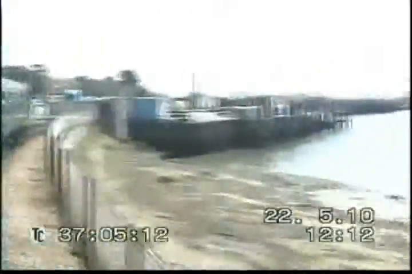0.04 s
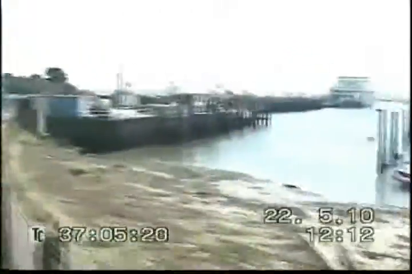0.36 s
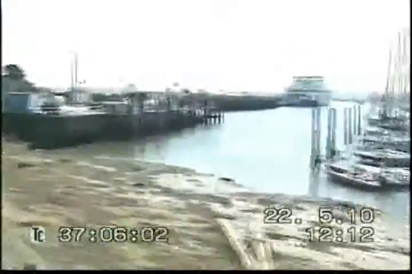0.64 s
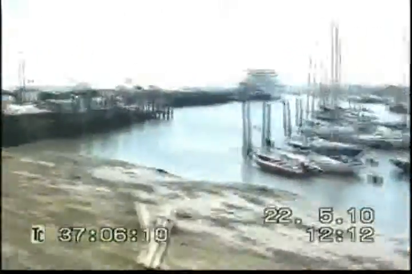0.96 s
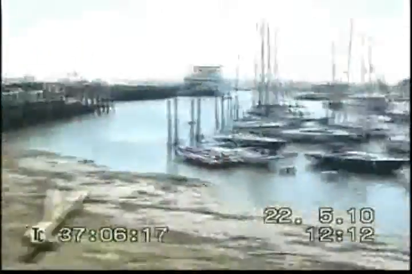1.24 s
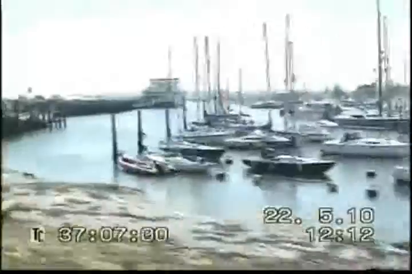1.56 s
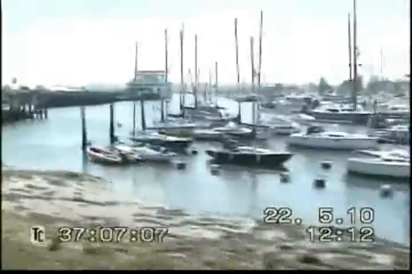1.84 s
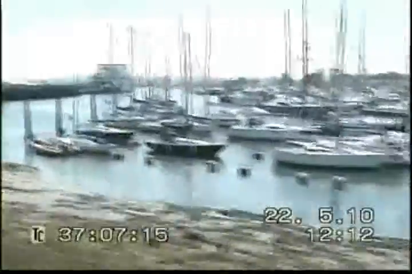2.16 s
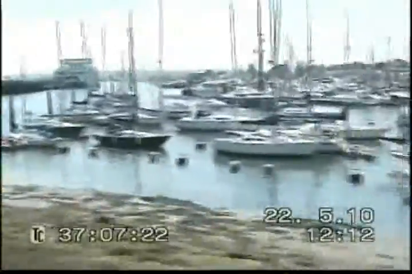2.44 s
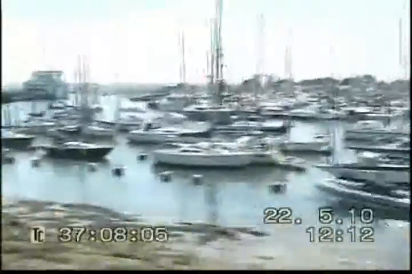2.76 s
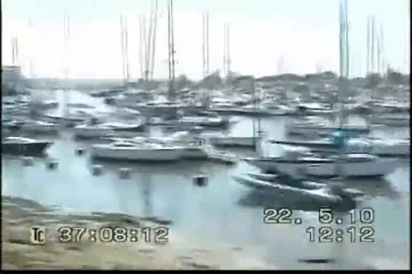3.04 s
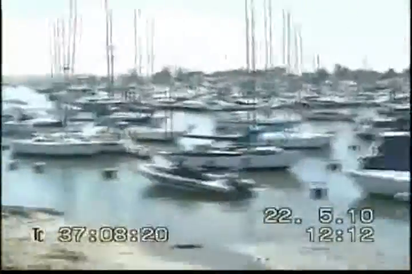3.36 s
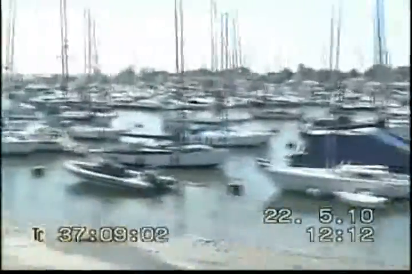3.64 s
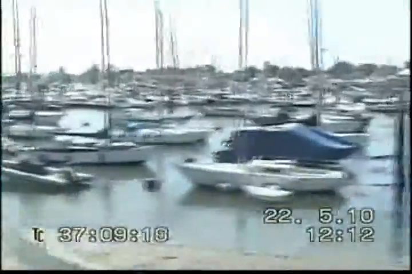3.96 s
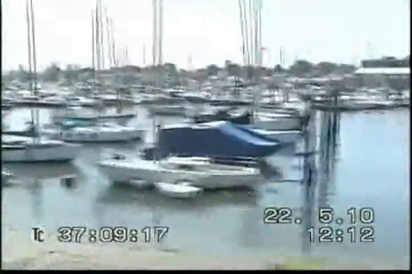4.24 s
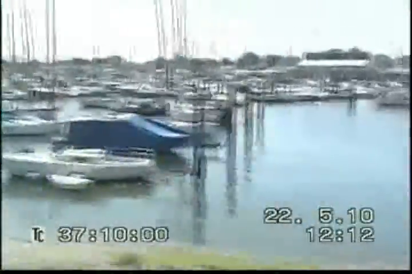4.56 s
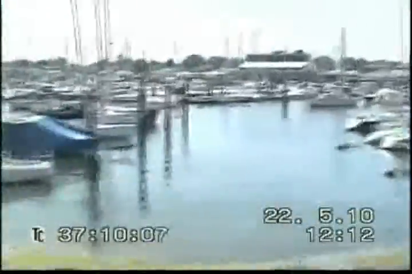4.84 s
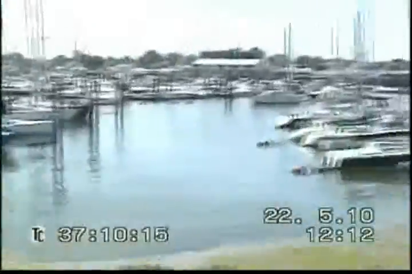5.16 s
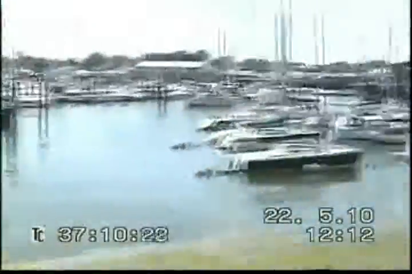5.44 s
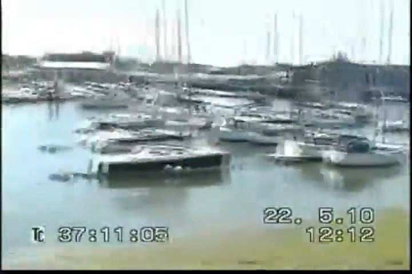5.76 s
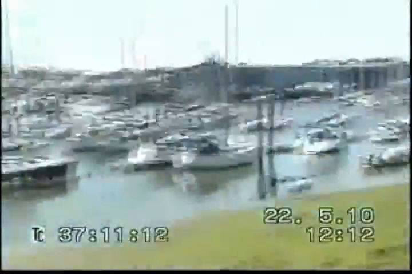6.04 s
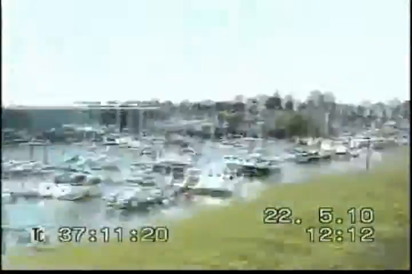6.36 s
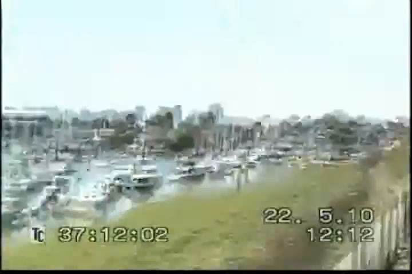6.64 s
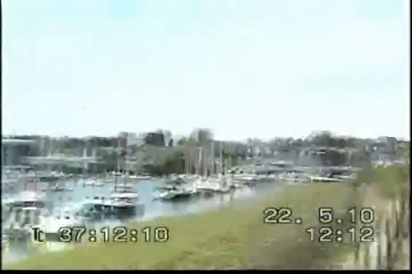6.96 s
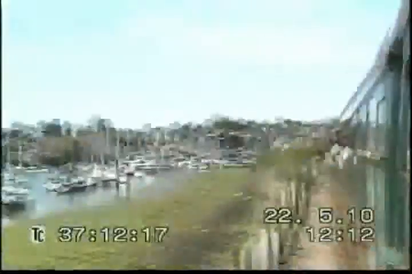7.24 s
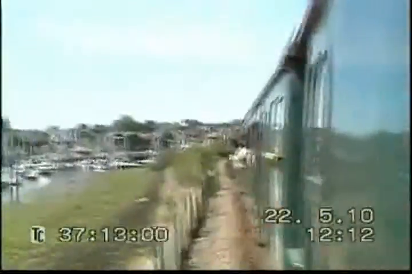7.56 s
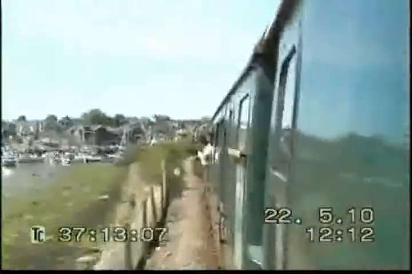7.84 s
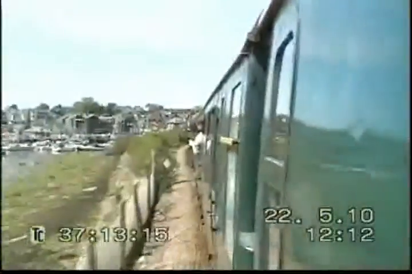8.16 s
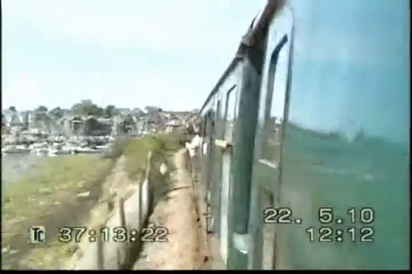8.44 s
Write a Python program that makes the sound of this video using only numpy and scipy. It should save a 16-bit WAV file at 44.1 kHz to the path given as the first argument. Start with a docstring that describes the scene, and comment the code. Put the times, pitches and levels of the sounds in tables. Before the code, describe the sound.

A moving train rumbles and roars along the rails, with irregular knocks, rattles and wind buffeting the microphone at an open window.

```python
"""Train wheels roar on the rails and rumble through a carriage as it rolls round a long bend.
Rail joints and the parts under the floor knock, loose fittings rattle, and now and then a wheel's
flange (the lip that keeps it on the track) grazes the rail and chirps. Air hisses past the open
window and thumps a microphone held outside. A hum filter makes it all sound slightly hollow."""
import sys
import numpy as np
from scipy import signal
from scipy.fft import rfft, irfft, next_fast_len
from scipy.io import wavfile

SR = 44100
rng = np.random.default_rng(int(sys.argv[2]) if len(sys.argv) > 2 else 0)


def wav_record(signal):
    """Record a signal, one row per channel, as 16-bit PCM in the file named by sys.argv[1]."""
    frames = np.transpose(np.atleast_2d(signal))
    bounded = np.clip(frames, -1, 1)
    # unit amplitude maps onto the largest positive 16-bit level
    quanta = np.round(bounded * 32767).astype(np.int16)
    wavfile.write(sys.argv[1], SR, quanta)


N = 383669
T = np.arange(N) / SR
HZ = np.maximum(np.arange(N // 2 + 1) * SR / N, 1)

# Pitches at which the carriage body likes to ring: pitch_hz, width_hz, boost_db
BODY_RESONANCES = [(92.4, 3.1, 6), (122, 4.3, 1.5), (226.7, 17, 4), (321.4, 12, 1.5), (374.6, 22, 3),
                   (505, 16, 1)]
# Pitches at which the steel wheels like to ring: pitch_hz, width_hz, boost_db
WHEEL_RESONANCES = [(800, 26, 3.5), (857, 16, 1.6), (1010, 30, 3.4), (1532, 70, 7), (1730, 45, 2.2),
                    (2160, 45, 3)]
# How hard the wheels grind through the bend: time_s, level_db
GRIND_LEVEL = [(0.0, -45), (1.19, -41), (2.52, -40.5), (2.88, -40), (3.0, -38.5), (3.3, -40.5), (4.61, -43),
               (4.72, -45.5), (5.04, -42), (6.3, -45.5), (6.45, -38.5), (6.75, -42.5), (8.25, -38),
               (8.7, -35.5)]
# How much the stereo sound is narrowed (lower is narrower): time_s, width_db
STEREO_WIDTH = [(0.0, -3), (0.4, -2.5), (0.56, -11), (0.7, -5.5), (0.93, -2.5), (1.1, -15), (1.3, -11.5),
                (1.47, -4), (1.8, -4), (2.15, -13.5), (2.4, -16.5), (2.58, -12), (2.91, -17), (3.12, -8.5),
                (3.47, -6.5), (3.8, -2), (4.0, -11), (4.25, -14.5), (4.5, -6), (4.7, -9), (5.15, -1),
                (5.47, -1.5), (5.78, -17), (5.98, -14), (6.15, -2), (6.48, -5), (6.62, -9), (6.95, -12),
                (7.25, -6.5), (7.55, -3), (7.85, -7.5), (8.07, -3), (8.28, -9), (8.5, -4), (8.7, -2.5)]
# Rough stretches of rail: time_s, wheel_scrape_db, carriage_boost_db
ROUGH_STRETCHES = [(0.14, -42, 1), (0.44, -40, 3), (1.19, -30, 0.5), (1.35, -38, -1), (1.45, -33.5, 0.5),
                   (2.25, -34, 2.5), (2.431, -27.5, 3), (2.59, -40, 3), (2.97, -30, -1), (3.52, -35, 2),
                   (3.73, -32.5, 1.5), (5.45, -29.5, -1), (5.84, -35.5, 2.5), (6.16, -28, 6.5),
                   (6.44, -35, -3.5), (7.35, -33.5, 0.5), (7.59, -27, -3.5), (7.80, -33, 2),
                   (8.03, -28, -1), (8.51, -27, 5), (8.645, -32, -4.5)]
# Moments when the sound dips briefly: time_s, hiss_change_db, train_change_db
LULLS = [(0.34, 1, -2.5), (1.505, -5.5, -3.5), (1.76, -1, -4), (1.92, -2, -0.5), (2.17, -3.5, -0.5),
         (2.9, 0, -2.5), (3.88, -1, -2), (4.34, -1.5, -1.5), (4.76, -2, -2.5), (5.22, -1.5, -0.5),
         (6.22, -4.5, -4), (6.72, 0.5, -1), (7.49, -3, -3), (8.54, 0, -2.5)]
ROUGH_HALF_S, LULL_HALF_S = 0.037, 0.035  # half the length of a rough stretch and of a lull


def undb(db):
    """Turn decibels into a number to multiply by."""
    return 10 ** (np.asarray(db) / 20)


def curve(table):
    """Join rows of (time_s, value) with straight lines."""
    return np.interp(T, *np.transpose(table))


def wander(rate_hz):
    """A smooth random wobble of typical size 1, turning about rate_hz times a second."""
    x = irfft(rfft(rng.standard_normal(N)) * np.exp(-(HZ / rate_hz) ** 2), N)
    return (x - x.mean()) / x.std()


def tone(points, resonances=()):
    """How strong each pitch is: a broad outline with resonant peaks on top."""
    hz, db = np.transpose(points)
    db = np.interp(np.log(HZ), np.log(hz), db)
    db -= 40 * np.log10(np.maximum(HZ / hz[-1], 1))  # fade out above the last point
    for pitch_hz, width_hz, boost_db in resonances:
        db = db + boost_db / (1 + (2 * (HZ - pitch_hz) / width_hz) ** 2)
    return undb(db)


def noise(gain, side_db, drive=1):
    """Stereo noise with the tone gain; drive makes it flutter, and a lower side_db makes it narrower."""
    mid, side = irfft(rfft(rng.standard_normal((2, N)) * drive) * gain, N)
    return (mid + undb(side_db) * side * np.array([[1], [-1]])) / mid.std()


def hit(start_s, fade_s, rise_s):
    """The loudness of a hit: it rises quickly, then falls 60 dB in fade_s."""
    age = np.maximum(T - start_s, 0)
    return (1 - np.exp(-age / rise_s)) * np.exp(-np.log(1000) * np.minimum(age / fade_s, 2))


def swell(time_s, half_s):
    """The loudness of something that comes and goes smoothly, peaking at time_s."""
    return (1 + ((T - time_s) / half_s) ** 2 / 2) ** -2


def sharp_tick(gain):
    """One tap with the tone gain, its energy packed at the very start (minimum phase)."""
    cepstrum = irfft(np.log(gain), N)
    one_sided = 2 * cepstrum * (T > 0) * (T < T[-1] / 2)
    tap = irfft(np.exp(rfft(one_sided)), N)[:SR // 20]
    return tap / np.abs(tap).max()


def play_at(spikes, sound):
    """Start the first half second of a sound at every spike, as loud as that spike."""
    return signal.fftconvolve(spikes, sound[:SR // 2])[:N]


def place(x, pan_db, width_db):
    """Set a stereo sound's width and lean it left (positive pan_db) or right."""
    mid, sign = x.mean(axis=0), np.array([[1], [-1]])
    return (mid + undb(width_db) * (x - mid)) * undb(sign * pan_db / 2)


def side_echo(x, delay_s=0.0035, sway_s=0.00013, strength=0.24):
    """Sound bounces off the carriage side; the hand holding the microphone sways, so the tone shifts."""
    late = T - delay_s - sway_s * wander(0.5)
    return x + strength * np.array([np.interp(late, T, channel) for channel in x])


def slipstream(flutter_db=1.5):
    """Air hisses along the carriage side, fluttering, with brief lulls."""
    # Loudness of the rushing air: time_s, level_db
    hiss_level = [(0.0, -48.5), (1.27, -43), (1.56, -43), (2.43, -40), (2.85, -43.5), (3.0, -38.5),
                  (3.12, -43.5), (3.84, -47), (4.31, -42), (4.83, -47), (4.98, -46), (5.5, -48),
                  (5.97, -43), (6.3, -45.5), (6.42, -46), (8.28, -42.5), (8.4, -46), (8.7, -48.5)]
    # Tone of the rushing air: pitch_hz, level_db
    hiss_tone = [(400, -21), (900, -4), (1600, 6), (2400, 2), (3300, 0), (4500, -5.5), (6000, -13),
                 (7200, -20.5), (8500, -27.5), (9500, -43)]
    hiss = noise(tone(hiss_tone), side_db=-16, drive=undb(flutter_db * wander(18)))
    lull_db = sum(db * swell(s, LULL_HALF_S) for s, db, _ in LULLS)
    return hiss * undb(curve(hiss_level) + lull_db)


def swishes():
    """Short, bright rushes of air pass the window."""
    # Each rush of air: time_s, level_db, half_length_s
    rushes = [(0.66, -54, 0.022), (1.04, -46, .015), (1.106, -46, .015), (1.15, -47, .01),
              (1.387, -44, 0.02), (1.89, -43, .02), (2.09, -45.5, .014), (2.428, -43, 0.012),
              (3.043, -40.5, .015), (3.326, -40, .016), (3.375, -48, .018), (4.654, -49, .015),
              (5.02, -45, .007), (5.057, -46.5, .026), (6.578, -46, 0.015), (6.67, -45, .014),
              (6.868, -48, .01), (7.078, -42, 0.027), (8.41, -30.5, .012), (8.45, -45.5, 0.028),
              (8.698, -30.5, 0.013)]
    # Tone of the rushes: pitch_hz, level_db
    swish_tone = [(400, -12.5), (900, 0), (1500, -8.5), (3200, 6), (4500, 3.5), (6200, -4), (7500, -11),
                  (8500, -21.5), (9500, -30.5)]
    loudness = sum(undb(db) * swell(s, half_s) for s, db, half_s in rushes)
    return loudness * noise(tone(swish_tone), side_db=-20)


def buffeting(slap_s=0.0017):
    """Swirling air booms in the window and thumps each side of the microphone; strong gusts slap both."""
    # Loudness of the wind on the microphone: time_s, level_db
    thump_level = [(0.0, -32), (0.78, -24.5), (1.08, -30), (1.25, -26), (2.9, -36), (3.01, -31.5),
                   (3.65, -30), (4.11, -34.5), (4.5, -32), (4.9, -35), (6.36, -36.5), (6.48, -27.5),
                   (7.1, -26.5), (8.15, -31.5), (8.46, -36), (8.7, -35)]
    # Tone of that wind: pitch_hz, level_db
    thump_tone = [(10, -16), (25, -10.5), (45, -4.5), (70, 2), (100, 1), (140, 1.5), (220, -5), (400, -16),
                  (900, -45)]
    # Loudness of the boom in the open window: time_s, level_db
    boom_level = [(0.0, -25.5), (0.81, -33), (1.29, -34.5), (1.53, -21.5), (1.68, -26.5), (4.01, -28.5),
                  (4.35, -22), (4.95, -33), (5.58, -31.5), (5.78, -22.5), (6.02, -23), (6.26, -27.5),
                  (6.56, -28), (6.66, -22), (6.76, -27), (7.0, -33), (7.38, -18.5), (7.61, -28.5),
                  (7.9, -31), (8.03, -23), (8.16, -30.5), (8.7, -22)]
    # Tone of that boom: pitch_hz, level_db
    boom_tone = [(45, -28.5), (75, -20), (92, -0.5), (130, 2), (175, 0), (300, -39.5)]
    # Gusts that slap the microphone: time_s, level_db
    gusts = [(0.763, -8), (1.553, -12), (6.51, -12), (6.654, -7), (7.346, -9), (7.365, -11), (8.417, -3.5),
             (8.527, -6.5)]
    thumps = noise(tone(thump_tone), side_db=-0.5)
    boom = noise(tone(boom_tone, BODY_RESONANCES), side_db=-8)
    slaps = sum(undb(db) * np.sinc((T - s) / slap_s) * swell(s, 2 * slap_s) for s, db in gusts)
    leak = signal.butter(2, 45, "high", fs=SR, output="sos")  # slow pressure leaks out of the microphone
    return thumps * undb(curve(thump_level)) + boom * undb(curve(boom_level)) + signal.sosfilt(leak, slaps)


def rattle(count=170, level_db=-49, range_db=9):
    """Loose fittings tick at random, harder while the wheels grind."""
    # Tone of the loose fittings: pitch_hz, level_db
    rattle_tone = [(600, -11), (1100, 0.5), (1600, 5), (2300, 0.5), (4200, -9), (6000, -18.5),
                   (9000, -42.5)]
    ticks = np.zeros(N)
    when, softness = rng.random((count, 2)).T
    ticks[(when * N).astype(int)] = undb(-range_db * softness)
    fading_ticks = play_at(ticks, hit(0, fade_s=0.029, rise_s=0.0013))
    shaking = undb(curve(GRIND_LEVEL))
    metal = noise(tone(rattle_tone, WHEEL_RESONANCES), side_db=-0.5)
    return undb(level_db) * fading_ticks * shaking / shaking.mean() * metal


def flange(roughness=0.55, waver_hz=170, chirp_half_s=0.017, jingle_db=-20, flicker_db=4):
    """The wheel's lip grazes the rail: a faint jingle that follows the grinding, and short rough chirps."""
    # Tone of the rubbing: pitch_hz, level_db
    rub_tone = [(1500, -19), (3000, 6), (6000, -6), (7500, -13.5), (9500, -32)]
    # High wheel resonances that the rubbing sets off: pitch_hz, width_hz, boost_db
    rub_resonances = [(3400, 530, 10), (4100, 200, -1), (5770, 140, 12.5), (6900, 300, 7.5)]
    # Chirps, each one wheel resonance ringing: time_s, pitch_hz, level_db
    chirp_notes = [(1.101, 5750, -57), (1.394, 5770, -54.5), (2.015, 5730, -55), (2.146, 5700, -59),
                   (2.461, 5730, -54), (2.542, 5740, -55), (2.967, 6900, -53), (2.975, 3520, -41),
                   (3.04, 6100, -48.5), (3.073, 5660, -48.5), (3.105, 4240, -47), (5.076, 5670, -51.5),
                   (5.414, 5720, -58), (6.424, 5750, -53), (6.479, 5700, -59), (7.229, 5770, -51.5),
                   (7.334, 5800, -54.5), (7.411, 5750, -64), (7.922, 5720, -55), (8.309, 5800, -54)]
    jingle = noise(tone(rub_tone, rub_resonances), side_db=-17.5, drive=undb(flicker_db * wander(25)))
    waver = 2 * np.pi * np.cumsum(waver_hz * wander(500)) / SR
    chirps = sum(undb(db) * swell(s, chirp_half_s) * np.sin(2 * np.pi * hz * T + waver)
                 for s, hz, db in chirp_notes)
    return jingle * undb(curve(GRIND_LEVEL) + jingle_db) + (1 + roughness * wander(200)) * chirps


def knocks(shudder_db=-3, crack_db=1, tick_db=7.5, thud_rise_s=0.0013, steel_rise_s=0.00067):
    """Each jolt shakes the panels and thuds in the floor; steel meets steel, ticks, clanks and rings."""
    # Jolts from joints and running gear: start_s, thud_db, clank_db, ring_pitch_hz, ring_above_clank_db
    jolts = [(0.143, -16.5, -50, 800, -1), (0.442, -17, -51, 800, -5), (0.602, -21.5, -39, 684, 7),
             (0.65, -13.5, -33.5, 656, 8), (0.659, -20.5, -33.5, 955, 3), (0.694, -17.5, -38, 800, -8),
             (1.018, -27, -32, 830, 3), (1.033, -21, -38, 980, -3), (1.18, -22.5, -43, 555, 8),
             (1.312, -18, -36, 1700, -5), (1.443, -19, -40, 1000, -1), (1.472, -23.5, -35, 820, 6),
             (1.547, -26.5, -33, 990, -3), (1.607, -18, -39, 690, 7), (1.680, -29, -41, 990, -3),
             (1.708, -16, -32.5, 1890, -9), (2.027, -22, -39, 676, 3), (2.082, -21, -37, 2400, -6),
             (2.481, -19.5, -47, 796, -6), (2.641, -30, -29.5, 3110, -8), (2.982, -22, -43, 1020, -3),
             (3.004, -22, -29, 1530, 2), (3.011, -19.5, -33, 844, -1), (3.022, -31, -37, 1530, -5),
             (3.031, -22.5, -30, 1130, -1), (3.270, -15.5, -45, 800, -4.5), (3.303, -23, -32, 4450, -11),
             (3.505, -25, -48, 800, 1), (3.569, -25, -42, 1000, 0), (3.733, -17, -37, 1014, 0),
             (4.531, -23, -36.5, 1126, 2), (4.642, -20, -32, 2040, -11), (4.654, -23.5, -37.5, 3600, -6),
             (4.85, -33, -37, 3500, -6), (4.926, -26, -41, 990, 1), (5.009, -22.5, -31, 1294, 5.5),
             (5.022, -29.5, -36, 1450, 4), (5.262, -31, -43, 1130, 2), (5.42, -23, -43, 1010, 1),
             (5.448, -24.5, -44, 990, -1), (5.659, -27, -38, 790, -5), (6.122, -25, -36, 975, -4),
             (6.363, -12, -39, 664, 7.5), (6.436, -27, -36.5, 1015, 3), (6.509, -22, -33, 1014, -4),
             (6.651, -14, -37, 3500, -6), (6.862, -17.5, -45, 794, -3), (7.026, -9, -30, 990, -4),
             (7.227, -17, -36, 1010, -7), (7.344, -36, -40.5, 1016, -4), (7.803, -17, -33, 985, 4),
             (8.124, -28, -45, 1000, -5), (8.399, -19, -33.5, 940, 3), (8.404, -29, -32, 940, 1),
             (8.409, -24, -33, 1560, -9), (8.505, -33, -37, 1000, 1), (8.637, -23, -29.5, 1130, -1)]
    # Tone of the shaking loose panels: pitch_hz, level_db
    panel_tone = [(40, -12.5), (110, -2), (230, 14), (380, -9.5), (700, -10.5), (1200, -24.5), (3000, -27),
                  (8000, -61.5)]
    # Tone of steel hitting steel: pitch_hz, level_db
    clank_tone = [(300, -1.5), (600, 12), (900, 14), (1300, 11.5), (1900, 5.5), (3500, -1.5), (5500, -11),
                  (7500, -25), (9500, -43.5)]
    # Notes within one steel ring: pitch_multiple, fade_s, level_db
    steel_notes = [(1, 0.069, -2), (1.14, .06, -7.5), (1.68, .05, -14)]
    # Notes of the struck floor: pitch_hz, fade_s, level_db
    floor_notes = [(95, 0.052, -9.5), (194, 0.045, -1), (244, 0.036, -0.5), (346, 0.05, 4.5),
                   (487, 0.019, 2), (710, 0.064, -8.5), (820, 0.04, -8)]
    shaking = sum(undb(db) * hit(s, fade_s=0.056, rise_s=thud_rise_s) for s, db, *_ in jolts)
    shudder = undb(shudder_db) * shaking * noise(tone(panel_tone, BODY_RESONANCES), side_db=-1.5)
    ring_samples = SR // 2
    age = T[:ring_samples]
    pushes, taps, rings = np.zeros((3, N + ring_samples))
    fades = [(multiple, undb(db) * hit(0, fade_s, steel_rise_s)[:ring_samples])
             for multiple, fade_s, db in steel_notes]
    for start_s, thud_db, clank_db, hz, ring_db in jolts:
        at = int(start_s * SR)
        pushes[at] += undb(thud_db)
        taps[at] += undb(clank_db)
        ring = sum(fade * np.sin(2 * np.pi * multiple * hz * age) for multiple, fade in fades)
        rings[at:at + ring_samples] += undb(clank_db + ring_db) * np.sqrt(2) * ring
    crack = undb(crack_db) * hit(0, fade_s=0.024, rise_s=steel_rise_s)
    tail = hit(0, fade_s=0.079, rise_s=steel_rise_s)
    clanks = play_at(taps, np.hypot(crack, tail)) * noise(tone(clank_tone), side_db=-13.5)
    ticks = undb(tick_db) * play_at(taps, sharp_tick(tone(clank_tone)))
    thud = sum(undb(db) * hit(0, fade_s, thud_rise_s) * np.sin(2 * np.pi * hz * T)
               for hz, fade_s, db in floor_notes)
    return shudder + clanks + ticks + rings[:N] + play_at(pushes, thud)


def carriage(uneven_rail, rumble_db=-24, uneven_db=0.5, flex_s=0.001955):
    """Rough rail makes the carriage rumble; its panels drone, drifting in pitch as they bend."""
    # Tone of the shaking carriage body: pitch_hz, level_db
    rumble_tone = [(60, -25), (120, -3), (170, -1), (210, 0), (260, 3), (370, -8), (480, -10.5),
                   (650, -19.5), (1000, -48.5)]
    # Tone of the panels' hollow drone: pitch_hz, level_db
    drone_tone = [(240, -34), (320, -2), (370, -1.5), (415, -2), (520, -37)]
    # Loudness of that drone: time_s, level_db
    drone_level = [(0, -30.5), (0.5, -32.5), (1.35, -25), (1.6, -33), (1.9, -28), (2.4, -24.5),
                   (2.85, -28.5), (3.25, -28.5), (3.7, -31), (3.9, -34.5), (4.1, -27.5), (4.8, -33.5),
                   (5.15, -30.5), (6.15, -26.5), (6.7, -35.5), (6.9, -28.5), (7.5, -35), (8.7, -28.5)]
    rumble = noise(tone(rumble_tone, BODY_RESONANCES), side_db=-0.5, drive=undb(uneven_db * uneven_rail))
    panels = noise(tone(drone_tone, BODY_RESONANCES), side_db=-2)
    bent_time = T + flex_s * wander(1.46)
    drone = np.array([np.interp(bent_time, T, channel) for channel in panels])
    shake_db = sum(db * swell(s, ROUGH_HALF_S) for s, _, db in ROUGH_STRETCHES)
    narrow_db = -0.17 * curve(STEREO_WIDTH)  # the rumble is turned up as the sound narrows
    return rumble * undb(rumble_db + shake_db + narrow_db) + drone * undb(curve(drone_level))


def wheels(uneven_rail, uneven_db=1.0, surge_db=0.85, chatter_db=2.0, scrape_in_grind_db=-9):
    """The wheels roar on the rails, grind and chatter in the bend, and scrape on rough stretches."""
    # Loudness of the rolling wheels: time_s, level_db
    roar_level = [(0.0, -31), (1.65, -25.5), (1.8, -28.5), (2.3, -27.5), (2.88, -25), (3.0, -24),
                  (3.39, -29), (3.78, -26.5), (3.9, -32), (6.38, -26), (6.72, -28.5), (7.7, -33),
                  (8.7, -27.5)]
    # Tone of the rolling wheels: pitch_hz, level_db
    roar_tone = [(250, -10), (450, 5), (550, 1), (680, -1), (820, -6.5), (980, -15), (1200, -22.5),
                 (2000, -48.5)]
    # Tone of the grinding wheels: pitch_hz, level_db
    grind_tone = [(500, -17.5), (900, 7), (1200, 5), (1600, 0), (2300, -5), (3300, -15.5), (5000, -41),
                  (8000, -59)]
    scrapes = sum(undb(db) * swell(s, ROUGH_HALF_S) for s, db, _ in ROUGH_STRETCHES)
    surge = undb(uneven_db * uneven_rail + surge_db * wander(8.9))
    roar = noise(tone(roar_tone, WHEEL_RESONANCES), side_db=-1.5, drive=surge)
    chatter = undb(uneven_db * uneven_rail + chatter_db * wander(150))
    grind = noise(tone(grind_tone, WHEEL_RESONANCES), side_db=-0.5, drive=chatter)
    return (roar * np.hypot(undb(curve(roar_level)), scrapes)
            + grind * np.hypot(undb(curve(GRIND_LEVEL)), undb(scrape_in_grind_db) * scrapes))


def scene():
    """The train shifts and spreads between the ears; the wind stays wide, the hiss near the middle."""
    # Which way the sound leans: time_s, left_minus_right_db
    lean = [(0.0, -4.5), (0.33, 5.5), (0.54, -2), (1.88, -3), (2.13, -1.0), (5.21, -7), (5.68, -2),
            (6.3, -0.5), (6.42, -3), (7.38, -1), (7.5, -3.5), (8.7, -3.5)]
    pan_db, width_db = curve(lean), curve(STEREO_WIDTH)
    uneven_rail = wander(22)  # makes the rumble and the roar swell together
    dips = undb(sum(db * swell(s, LULL_HALF_S) for s, _, db in LULLS))
    high_sounds = side_echo(slipstream() + swishes() + flange())
    body = dips * carriage(uneven_rail) + knocks()
    rolling = dips * (wheels(uneven_rail) + rattle())
    return (place(high_sounds, 0.1 * pan_db, 0.25 * width_db)
            + place(buffeting(), 0.25 * pan_db, 0)
            + place(body, pan_db, width_db)
            + place(rolling, 0.97 * pan_db, width_db))


def record(dry, hum_hz=149.8, feedback=0.5, depth=0.94, shallower_hz=12000, top_hz=9450):
    """A filter against motor whine cuts each multiple of hum_hz, less in the treble; the top is cut off."""
    size = next_fast_len(N + SR // 4)
    hz = np.arange(size // 2 + 1) * SR / size
    delay = np.exp(-2j * np.pi * hz / hum_hz)  # one cycle of the hum
    hum_peaks = (1 - feedback) / 2 * (1 + delay) / (1 - feedback * delay)
    notches = 1 - depth * np.exp(-hz / shallower_hz) * hum_peaks
    fade_in = np.minimum(T / 0.004, 1)
    hollow = irfft(rfft(dry * fade_in, size) * notches, size)[:, :N]
    return signal.sosfilt(signal.ellip(8, 0.2, 70, top_hz, fs=SR, output="sos"), hollow)


dry = scene()
out = record(dry)
wav_record(out)
```